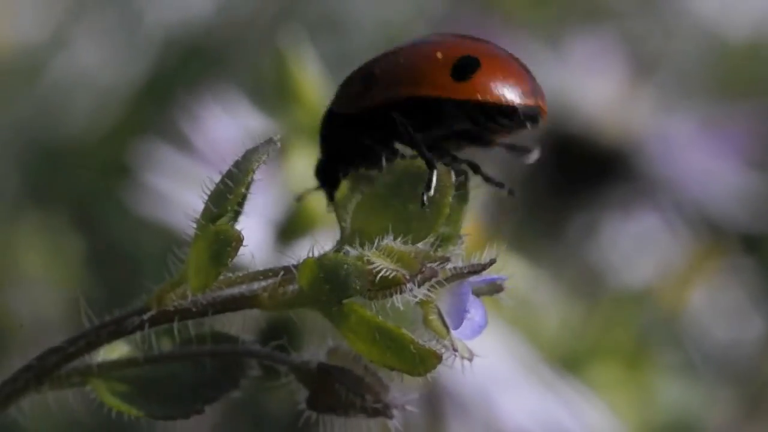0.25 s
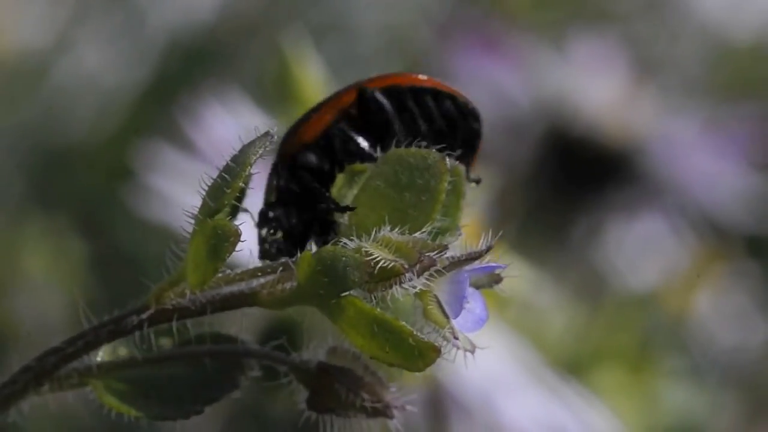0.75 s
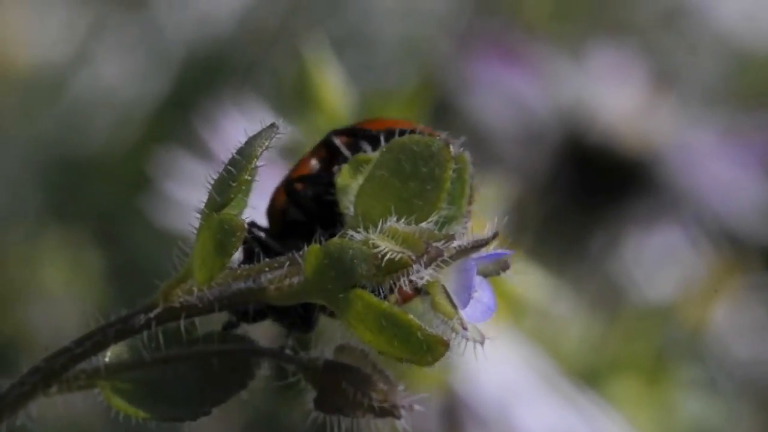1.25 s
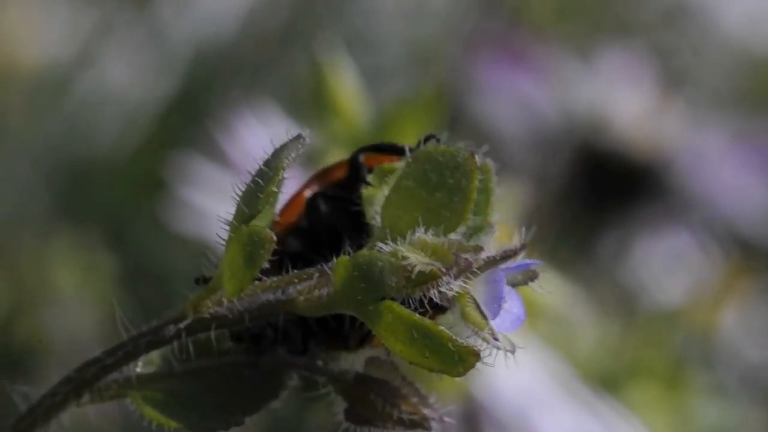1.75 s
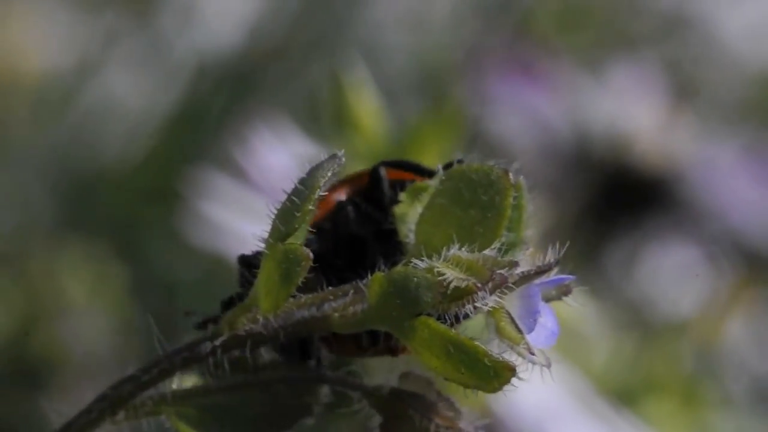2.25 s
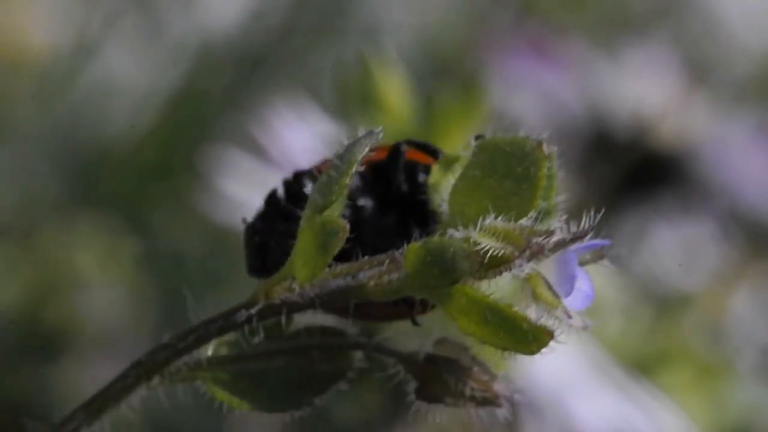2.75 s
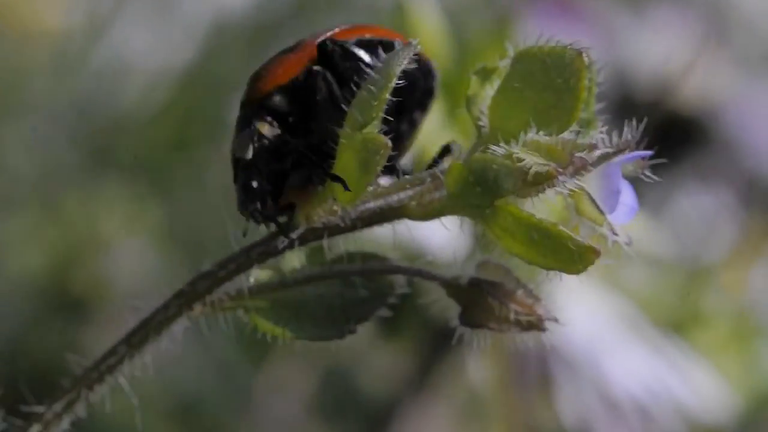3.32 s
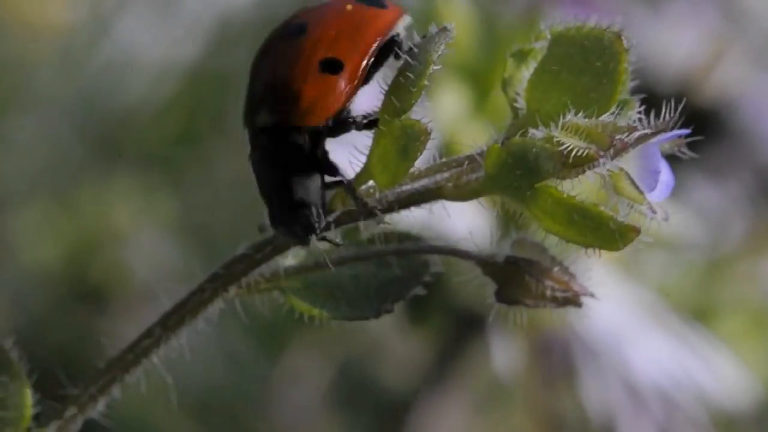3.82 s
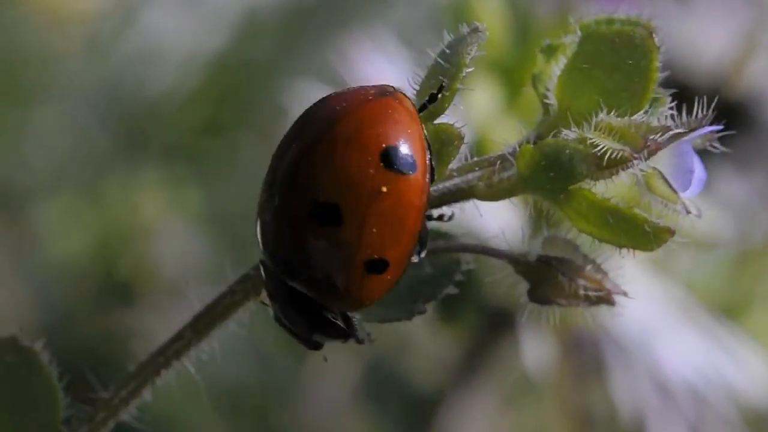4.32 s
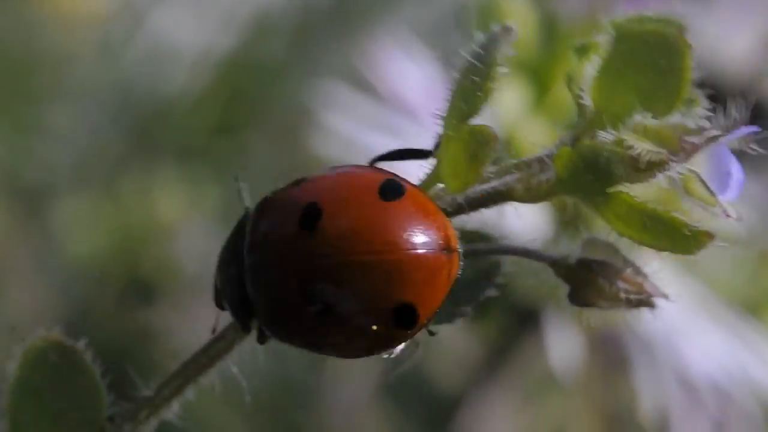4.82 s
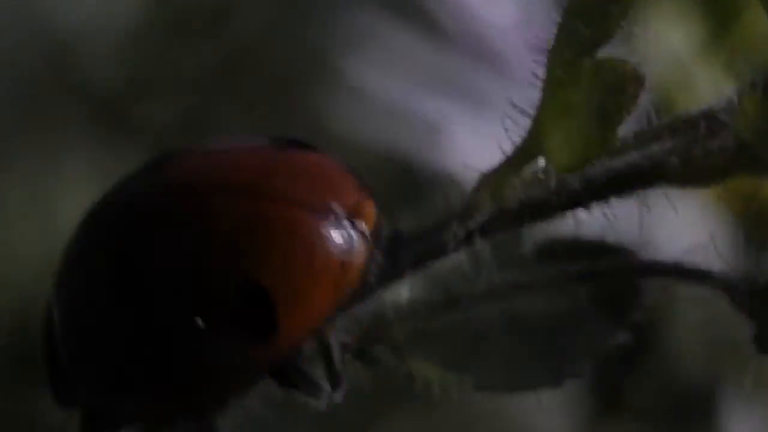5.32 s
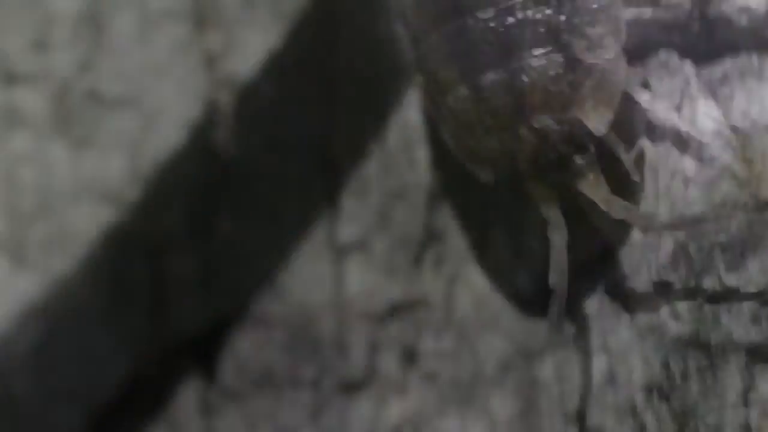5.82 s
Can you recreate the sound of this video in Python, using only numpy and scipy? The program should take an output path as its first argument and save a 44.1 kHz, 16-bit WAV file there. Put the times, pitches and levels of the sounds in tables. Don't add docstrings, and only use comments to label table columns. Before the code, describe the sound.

A songbird a few metres away whistles two fluted, echoing phrases, each ending in quick twittering, over soft distant town wash with faint leaf ticks.

```python
import sys
import numpy as np
from scipy import signal
from scipy.io import wavfile
from scipy.ndimage import uniform_filter1d

SR = 44100
rng = np.random.default_rng(int(sys.argv[2]) if len(sys.argv) > 2 else 0)


def dump_mix(stems):
    frames = np.atleast_2d(stems).T
    limited = np.clip(frames, -1, 1)
    pcm = np.round(limited * 32767).astype(np.int16)
    wavfile.write(sys.argv[1], SR, pcm)


def how_loud(loudness_db):
    steps = np.asarray(loudness_db, float) / 20
    return 10 ** steps


N = 267687

# (frequency [Hz], density [dB per Hz])
WASH = [(20, -37), (40, -43), (80, -19.5), (160, -20.5), (260, -12), (450, -4.5), (800, 1), (1150, -0.5),
        (1700, -6), (2600, -8.5), (5000, -11), (10000, -12.5), (16000, -14)]
# (time [s], level [dB])
SWELL = [(0, 1), (1, 2), (2, 1.5), (2.6, 1.8), (3.6, 2), (4.3, 2.5), (5.1, 3), (5.5, 2), (6.1, 1.5)]
# (time [s], pitch [Hz], level [dB])
PHRASE_ONE = [
    [(.506, 1903, -49), (.516, 1908, -39), (.53, 1922, -40.5), (.562, 1865, -31.5), (.582, 1510, -40.5),
     (.62, 1874, -31), (.655, 1947, -38.5), (.685, 1872, -31), (.712, 1640, -40)],
    [(.828, 2270, -37), (.845, 2350, -25.5), (.87, 2044, -25), (.89, 2142, -32.5), (.91, 2230, -26.5),
     (.935, 2360, -29.5), (.95, 2695, -25.5), (.985, 3312, -35), (1.02, 3280, -28), (1.048, 3115, -45)],
    [(1.213, 1970, -43), (1.226, 2270, -31), (1.26, 2283, -28.5), (1.31, 2198, -23.5), (1.34, 2192, -26),
     (1.362, 2110, -31.5), (1.376, 1910, -32.5), (1.386, 1660, -39)],
    [(1.383, 1647, -33.5), (1.41, 1444, -46), (1.45, 1425, -45.5), (1.49, 1463, -47), (1.52, 1439, -41),
     (1.548, 1488, -54), (1.568, 1486, -44), (1.59, 1470, -57), (1.605, 1493, -64), (1.66, 1456, -56)],
]
PHRASE_TWO = [
    [(2.768, 1647, -50), (2.79, 1627, -41), (2.818, 1667, -35.5), (2.84, 1458, -33.5), (2.87, 1422, -47),
     (2.962, 1442, -52)],
    [(2.97, 1380, -44), (2.98, 1420, -35.5), (2.993, 1270, -41)],
    [(3.063, 1650, -48), (3.078, 1840, -33.5), (3.092, 2011, -29), (3.11, 2025, -23), (3.125, 1988, -29.5),
     (3.134, 1700, -38)],
    [(3.233, 2121, -27.5), (3.256, 2212, -28), (3.28, 2350, -26), (3.305, 2470, -27), (3.335, 2642, -23),
     (3.39, 2697, -25), (3.45, 2756, -25.5), (3.497, 2658, -29.5)],
]
PHRASE_TWO_END = [
    [(3.733, 1620, -54), (3.745, 1707, -55), (3.762, 1660, -47), (3.773, 1640, -44.5), (3.78, 1630, -37)],
    [(3.76, 2524, -52), (3.775, 2503, -42), (3.797, 2482, -37.5), (3.803, 2445, -52), (3.81, 2437, -37.5),
     (3.83, 2394, -38.5), (3.835, 2310, -41), (3.846, 2170, -40)],
    [(3.84, 1637, -43), (3.855, 1655, -35), (3.88, 1650, -32.5), (3.9, 1668, -32), (3.907, 1650, -48)],
    [(3.94, 1676, -54), (3.98, 1718, -35), (4.02, 1733, -33.5), (4.07, 1797, -29.5), (4.085, 1873, -36.5),
     (4.1, 1960, -26.5), (4.109, 1960, -38)],
    [(4.104, 2016, -34), (4.115, 2155, -36.5), (4.125, 2473, -31), (4.138, 2605, -28), (4.165, 2600, -41),
     (4.185, 2590, -27), (4.197, 2567, -28), (4.208, 2547, -22.5), (4.216, 2440, -23)],
]
# (2nd multiple [dB], 3rd [dB], higher ones [dB], throat ring [Hz],
# held back at the onset [dB])
COLOURS = [(-12, -4, -12, 10200, 2), (-3.5, -17, -10, 8000, 8), (-9.5, -9, -9.5, 12100, 10),
           (-5.5, -10, 0.5, 11700, -3.5), (-4, -6, -9, 13000, 0), (-3, -7, -9, 11000, 9),
           (-14, -11, -8.5, 10150, 10), (2, 6, -3.5, 10600, 17), (5.5, -4, -12, 9100, 6.5),
           (-9, -13, -7, 9800, 12), (-5, -5, -7, 9800, 4), (-5.5, 2, -1, 12100, 20), (5, -12, -7, 10570, 3)]
HIGHER_DB = (-2.5, 1, 5, -5, 4, -7)
# (frequency [Hz], level [dB])
BEAK = [(1500, 20), (3200, 12), (4500, 3.5), (5300, -6.5), (6500, 4.5), (7500, -11), (8600, -0.5),
        (9300, 2), (10000, 2.5), (10700, 5.5), (11800, -1), (12600, 1), (13500, -9), (16000, -5)]
# (arches [count], length of one [s])
WARBLE = [(3, .0208), (2, .025), (5, .0306)]
# (time [s], depth [Hz])
WARBLE_DEPTH_HZ = [(3.25, 563), (3.3, 575), (3.34, 440), (3.37, 603), (3.47, 642)]
# (frequency [Hz], t60 [s])
GARDEN = [(800, 0.58), (1700, 0.66), (2500, 0.63), (3500, 0.6), (6000, 0.41), (9000, 0.3), (14000, 0.29)]
# (delay [s], level [dB])
WALLS = [(.009, -11.5), (.024, -10), (.04, -15.5), (.062, -29), (.075, -33), (0.151, -25.5)]
# (time [s], pitch [Hz], level [dB])
HUM = [(.7, 325, -65), (1, 338.7, -63), (1.6, 336.7, -63), (2.198, 324.7, -62.5), (3.1, 332, -65),
       (3.699, 331, -69)]
# (time [s], peak [dB], ring [Hz], ring t60 [s], bright crack [dB])
TICKS = [(.7105, -11, 1500, .006, -20), (.7113, -24, 3300, .004, -25), (.7112, -18.5, 720, .011, -40),
         (.802, -42, 3500, .02, -42), (.8495, -36, 5000, .01, -33), (.904, -25, 800, .03, -42),
         (.922, -26, 850, .03, -42), (1.507, -38, 3000, .01, -52), (1.305, -40, 3200, .02, -46),
         (1.868, -32, 900, .03, -50), (1.889, -35, 900, .03, -50), (2.1935, -34, 4000, .004, -33),
         (2.148, -42, 4000, .015, -55), (2.238, -36, 2000, .008, -36), (4.1485, -20, 700, .012, -26),
         (4.17, -30, 800, .02, -45), (4.136, -32, 900, .015, -45), (4.183, -32, 800, .015, -45),
         (4.193, -32, 700, .015, -45), (4.207, -28, 1100, .012, -42), (3.849, -30, 2200, .012, -42),
         (4.602, -35, 750, .03, -55), (4.614, -35, 750, .03, -55), (5.228, -44, 8000, .02, -35),
         (5.523, -38, 1500, .02, -38), (5.843, -34, 1000, .03, -38)]
# (start [s], length [s], level [dB], centre [Hz], width [Hz])
RUSTLES = [(0.78, 0.029, -36.5, 4000, 8200), (1.748, 0.073, -42.5, 2800, 1300),
           (1.733, 0.25, -49.5, 2150, 1300), (2.07, 0.073, -54, 6000, 2000),
           (0.748, 0.094, -45.5, 2800, 1700), (0.79, 0.054, -49.5, 11000, 5040),
           (0.96, 0.091, -52, 5500, 7000), (5.1, .05, -66, 7400, 3000), (0.788, 0.079, -49, 9000, 9000),
           (0.83, 0.12, -39.5, 830, 1400), (2.956, 0.19, -48.5, 2000, 2000), (4.107, 0.17, -42, 1300, 1000),
           (4.177, 0.55, -46, 4300, 4800), (5.173, 0.19, -49, 1400, 1400), (5.6, 0.057, -46, 4700, 10000)]
# (time [s], pitch [Hz], level [dB])
UPPER = [
    [(1.728, 2086, -52), (1.74, 3350, -39), (1.752, 7330, -49), (1.761, 8250, -37), (1.766, 8700, -55)],
    [(2.112, 8200, -55), (2.125, 8560, -50), (2.158, 8200, -43.5), (2.18, 8150, -57)],
    [(2.183, 5850, -39), (2.187, 6500, -40), (2.19, 7530, -47), (2.196, 8300, -46), (2.21, 8190, -45),
     (2.232, 7900, -59), (2.24, 7700, -43), (2.249, 6600, -61)],
    [(4.633, 4720, -48), (4.652, 5100, -43), (4.664, 5850, -40), (4.676, 6190, -38.5), (4.74, 6110, -45),
     (4.751, 6160, -46)],
    [(4.892, 3700, -46), (4.9, 6860, -43), (4.906, 6060, -44), (4.92, 6360, -50)],
]
# (start [s], length [s], from [Hz], ceiling [Hz], level [dB])
WHIPS = [(1.77, .017, 5500, 8350, -39), (1.79, .018, 4900, 8350, -40), (1.812, .011, 5150, 8300, -41),
         (1.896, .068, 6160, 8220, -48), (1.992, .072, 3600, 8100, -47)]
# (time [s], pitch [Hz], level [dB])
FALL = [
    [(1.748, 2000, -48), (1.757, 2300, -47), (1.763, 2900, -38), (1.769, 2700, -45)],
    [(1.778, 3200, -42), (1.782, 3250, -33), (1.786, 3200, -35), (1.792, 3500, -44), (1.797, 3800, -34)],
    [(4.684, 4200, -47), (4.7, 3930, -36.5), (4.71, 3760, -44), (4.717, 3700, -30.5), (4.728, 3640, -31),
     (4.742, 3573, -36), (4.75, 3560, -45)],
]
# (start [s], length [s], from [Hz], to [Hz], level [dB])
LOWER = [(1.767, 0.0088, 4130, 3460, -41), (1.785, 0.015, 4850, 3660, -55),
         (1.797, 0.0123, 3400, 2790, -41), (1.806, .009, 4350, 3200, -37), (1.814, .012, 3450, 3000, -42),
         (4.353, .027, 4300, 2400, -41), (4.881, .014, 3670, 3750, -41), (4.897, 0.04, 3800, 3800, -50.5)]
# (time from the chip's start [s], pitch [Hz], level [dB])
LEAD = [(0, 3993, -47), (.008, 4070, -46), (.012, 3640, -33.5), (.02, 3550, -31), (.024, 3400, -42),
        (.027, 3290, -40), (0.033, 3000, -43)]
ANSWER = [(0, 3600, -51), (.004, 3590, -26.5), (.008, 3390, -45), (.014, 3350, -39.5), (0.024, 3130, -47)]
# (lead [s], answer [s], level [dB])
PAIRS = [(1.901, 1.937, 0), (2.003, 2.04, -3)]
# (time [s], level [dB])
HOARSE = [(1.83, -3), (1.9, -10), (2.1, -14), (4.6, -20)]
# (start [s], length [s], from [Hz], to [Hz], level [dB])
FAR = [(5.262, .02, 2420, 2730, -59), (5.285, .015, 2950, 4100, -57), (5.33, .014, 4850, 2500, -53),
       (3.04, .06, 2870, 4130, -68)]
# (start [s], length [s], settles on [Hz], level [dB], coupling of the two sides [dB])
TRILL = [(4.372, 0.03, 3790, -27.5, -5), (4.407, 0.03, 3810, -25, -3), (4.443, 0.038, 3876, -27.5, -1.5),
         (4.48, 0.025, 3745, -26.5, 0.5), (4.514, 0.034, 3630, -28.5, 2), (4.548, 0.034, 3450, -35, -1)]
# (time from the stroke [s], pitch [Hz], level [dB])
UNDER = [(-.007, 3800, -56), (0, 2955, -49), (.008, 2280, -49.5), (.02, 2120, -53), (.032, 2035, -47)]
# (frequency [Hz], level [dB])
WHINE = [(15704, -84), (15734, -94)]

TOP_HZ = 15790
TWITTER_TIMBRE = (-3, -30)


def evened(x):
    return x / np.sqrt(np.mean(x ** 2) + 1e-20)


def drift(size):
    once = uniform_filter1d(rng.standard_normal(N), size=size)
    return evened(uniform_filter1d(once, size=size))


def curve(points):
    return np.interp(np.arange(N) / SR, *np.transpose(points))


def read(points, hz):
    f, value = np.transpose(points)
    return np.interp(np.log(hz + 1), np.log(f + 1), value)


def add(mix, s, sound):
    part = mix[round(s * SR):][:len(sound)]
    part += sound[:len(part)]


def resonate(x, hz, width):
    turn = np.exp(2j * np.pi * hz * np.arange(len(x)) / SR)
    r = np.exp(-np.pi * width / SR)
    return 2 * (turn * signal.lfilter([1 - r], [1, -r], x / turn)).real


def wash():
    frames, hz = N // 256 + 5, np.fft.rfftfreq(1024, 1 / SR)
    a, b, patches = rng.standard_normal((frames, 513, 3)).T
    patches = uniform_filter1d(patches, size=10, axis=0)
    patches = evened(uniform_filter1d(patches, size=12, axis=1))
    patchy_db = read([(300, 3.0), (1500, 0.51), (5000, .7)], hz)[:, None]
    z = (a + 1j * b) * how_loud(read(WASH, hz)[:, None] + patchy_db * patches)
    noise = signal.istft(z, nperseg=1024, noverlap=768)[1][:N]
    return how_loud(-48 + curve(SWELL)) * evened(noise)


def breeze():
    return how_loud(-84.0 + 4.7 * drift(3000)) * evened(resonate(rng.standard_normal(N), 86, 58))


def voice(notes, timbres, drops=None, fade=0.0011, reedy_db=-60, shimmer_db=1.1, wobble=0.00027,
          follow=1., octave_db=0., mid_hz=2000, rings_hz=None, shy_db=None, patchy_db=0., bloom=.3,
          size=200, glide_db=0.):
    out = np.zeros(N)
    shimmer = shimmer_db * drift(90)
    patches = patchy_db * evened(uniform_filter1d(shimmer, size=500))
    for n, (rows, timbre) in enumerate(zip(notes, timbres)):
        s, *columns = np.transpose(rows)
        t = np.arange(s[0], s[-1], 1 / SR)
        first = round(s[0] * SR)
        span = slice(first, first + len(t))
        hz, db = (uniform_filter1d(np.interp(t, s, c), size=size, mode="nearest") for c in columns)
        effort_db = follow * (db + 30) - 30
        bright_db = effort_db + reedy_db + octave_db * np.log2(hz / mid_hz) + 0.33 * shimmer[span]
        if shy_db:
            bright_db -= shy_db[n] * np.exp(-(t - s[0]) / (bloom * (s[-1] - s[0])))
        troughs_db, full_glide = 0, 9000
        if drops is not None:
            drop = drops[span]
            bright_db -= np.interp(t, [3.2, 3.3, 3.35, 3.4], [0.0049, 0.013, 0.028, 0.0033]) * drop
            hz = hz - drop
            troughs_db = -.018 * drop
            db = db - np.interp(t, [3.2, 3.23, 3.29, 3.33], [.011, .026, .02, .008]) * drop
            full_glide = np.where(troughs_db < 0, 70000, 9000)
        glide = abs(np.gradient(hz)) * SR / full_glide
        slurred_db = -glide_db * np.minimum(glide, 1)
        hz = hz * (1 + wobble * shimmer[::-1][span])
        phase = 2 * np.pi * (np.cumsum(hz) / SR + rng.random())
        tone = how_loud(db + shimmer[span]) * np.sin(phase)
        for k, own_db in enumerate(timbre, start=2):
            over_db = bright_db + own_db + (slurred_db if k < 4 else troughs_db) + read(BEAK, k * hz)
            over_db = over_db + patches[first - 2000 * k:][:len(t)]
            if rings_hz:
                over_db += 6 / (1 + ((k * hz - rings_hz[n]) / 230) ** 2)
            tone += (k * hz < TOP_HZ) * how_loud(over_db) * np.sin(k * phase)
        edge = np.clip(np.minimum(t - s[0], s[-1] - t) / fade, 0, 1)
        add(out, s[0], np.sqrt(2) * tone * np.sin(np.pi / 2 * edge) ** 2)
    return out


def pitch_drops():
    t = np.arange(N) / SR
    start, end, rate_hz, depth_hz = .885, .978, 111, 620
    wobble = np.sin(np.pi * (t - start) * rate_hz) ** 2
    flutter = depth_hz * wobble * np.interp(t, [start, start + 0.0075, end - .03, end], [0, 1, 1, 0])
    arches, period = np.transpose(WARBLE)
    at = 3.23 + np.cumsum(np.append(0, arches * period))
    turns = np.interp(t, at, np.cumsum(np.append(0, arches)))
    lean = np.interp(t, [3.25, 3.36], [.36, .85])
    sharp = np.interp(t, [3.25, 3.31], [1.0, 1.6])
    trough = (1 - np.sin(np.pi * (turns % 1) ** lean)) ** sharp
    warble = curve(WARBLE_DEPTH_HZ) * (t > at[0]) * (t < at[-1]) * trough
    return uniform_filter1d(warble + flutter, size=40)


def flute():
    timbres = [(second, third, *np.add(HIGHER_DB, higher)) for second, third, higher, *_ in COLOURS]
    return voice(PHRASE_ONE + PHRASE_TWO + PHRASE_TWO_END, timbres, pitch_drops(), fade=0.0037,
                 reedy_db=-27, follow=0.28, octave_db=16.0, shy_db=[row[-1] for row in COLOURS],
                 bloom=0.12, patchy_db=2.5, glide_db=11, rings_hz=[row[-2] for row in COLOURS])


def garden(x):
    taps = np.zeros(SR)
    at = np.arange(300, SR - 20, 20)
    taps[at + rng.integers(0, 20, len(at))] = rng.choice([-1., 1.], len(at))
    taps *= 1 - 0.067 * np.exp(-np.arange(SR) / SR / 0.0037)
    for s, db in WALLS:
        add(taps, s, how_loud(db + 6.5) * rng.standard_normal(400) * np.hanning(400))
    hz, t, z = signal.stft(taps, SR, nperseg=256)
    air_db = read([(2000, -1.3), (6000, 2.4), (12000, -0.39)], hz)[:, None]
    decay_db = air_db - 60 * t / read(GARDEN, hz)[:, None]
    tail = signal.istft(z * how_loud(decay_db), SR, nperseg=256)[1]
    return how_loud(-3.0) * signal.fftconvolve(x, tail / np.linalg.norm(tail))[:N]


def insect():
    t, (s, hz, db) = np.arange(N) / SR, np.transpose(HUM)
    waver = drift(3000)
    phase = 2 * np.pi * np.cumsum(np.interp(t, s, hz) + 3.13 * waver) / SR
    return how_loud(np.interp(t, s, db, -99, -99) + 1.7 * np.roll(waver, SR)) * np.sin(phase)


def leaves():
    out, t = np.zeros(N), np.arange(2000) / SR
    for s, db, hz, t60, crack_db in TICKS:
        snap = rng.standard_normal(len(t)) + 1.64 * (t < .00007)
        crack = how_loud(crack_db - 60 * t / 0.0051) * snap
        add(out, s, how_loud(db - 60 * t / t60) * np.sin(2 * np.pi * hz * t) + crack)
    size = np.minimum(rng.exponential(1, N // 60 + 1), 3)
    grains = rng.standard_normal(N) * how_loud(2.4 * np.repeat(size, 60)[:N])
    for s, length, db, hz, width in RUSTLES:
        part = evened(resonate(grains[round(s * SR):][:round(length * SR)], hz, width))
        add(out, s, how_loud(db) * part * signal.windows.tukey(len(part), .6))
    return signal.sosfilt(signal.butter(8, 440, "high", fs=SR, output="sos"), out)


def strokes(rows, pitch, peak, start_db, end_db):
    u = np.linspace(0, 1, 16)
    rise_db = start_db * (1 - u / peak) ** 2
    fall_db = end_db * ((u - peak) / (1 - peak)) ** 2
    swell_db = np.where(u < peak, rise_db, fall_db)
    return [np.transpose([s + length * u, pitch(length * u, length, *hz), db + swell_db])
            for s, length, *hz, db in rows]


def slide(t, length, from_hz, to_hz):
    u = (t / length) ** 0.98
    return from_hz + (to_hz - from_hz) * (u + 0.44 * np.sin(2 * np.pi * u) / (2 * np.pi))


def whip(t, length, from_hz, top_hz):
    climb_hz_per_s, knee, sag_hz_per_s = 290000, 5, 3500
    climb = climb_hz_per_s * t / (top_hz - from_hz)
    rounded = climb / (1 + climb ** knee) ** (1 / knee)
    droop = 1000 * np.exp((t - length) / .007) * (length > .03)
    return from_hz + (top_hz - from_hz) * rounded - droop - sag_hz_per_s * t


def twitter():
    high = UPPER + strokes(WHIPS, whip, peak=.3, start_db=-4, end_db=-2)
    chips = [np.add(shape, [s, 0, db]) for *starts, db in PAIRS for shape, s in zip((LEAD, ANSWER), starts)]
    low = FALL + chips + strokes(LOWER, slide, peak=.45, start_db=-8, end_db=-8)
    upper = voice(high, [(-20, -26)] + [TWITTER_TIMBRE] * len(high), fade=0.00028, reedy_db=-11.5,
                  shimmer_db=3.0, wobble=0.0017, size=90, octave_db=-13, mid_hz=6500)
    lower = voice(low, [(-22, -9)] * 2 + [(-11, -11)] + [(6, -1.5)] * len(low), fade=0.00042,
                  reedy_db=-18.5, shimmer_db=2.5, wobble=0.0013, octave_db=-30, mid_hz=3540, size=70)
    coupled = upper * np.tanh(lower / how_loud(-41)) * how_loud(-35.5)
    sums = how_loud(33.5) * resonate(resonate(coupled, 10900, 3600), 10900, 3600)
    hoarse = how_loud(curve(HOARSE)) * (upper + lower) * resonate(rng.standard_normal(N), 1700, 840)
    return upper + lower + sums + hoarse


def far_bird():
    notes = strokes(FAR, slide, peak=.45, start_db=-4, end_db=-5)
    return voice(notes, [()] * len(FAR), shimmer_db=4)


def settle(t, length, end_hz):
    return end_hz + (4824 - end_hz) * np.exp(-t / 0.014)


def trill():
    notes = strokes([row[:-1] for row in TRILL], settle, peak=0.43, start_db=-11.5, end_db=-10.5)
    upper = voice(notes, [np.add((0, -6), row[-1]) for row in TRILL], fade=0.0023, reedy_db=-13.5,
                  shimmer_db=1.5, wobble=0.0015, octave_db=-53, mid_hz=4000,
                  shy_db=[8.0] * len(TRILL), bloom=0.3)
    dives = [np.add(UNDER, [row[0], 0, row[-1]]) for row in TRILL]
    under = voice(dives, [TWITTER_TIMBRE] * len(TRILL), fade=0.0018, reedy_db=5.0, shimmer_db=3.5,
                  wobble=0.0058)
    rattle = how_loud(37) * resonate(resonate(upper * under, 6400, 2200), 6400, 2200)
    rattle += how_loud(72.5) * resonate(resonate(upper ** 2 * under, 8300, 2500), 8600, 2300)
    rasp = upper * resonate(rng.standard_normal(N), 2200, 1500)
    rattle += how_loud(-13) * resonate(resonate(rasp, 7000, 2400), 4800, 2400)
    return upper + how_loud(-1.0) * under + rattle


def scene():
    whistles, chatter, rattled = flute(), twitter(), trill()
    far, litter = far_bird(), leaves()
    sent = whistles + how_loud(-4.5) * rattled + how_loud(-2) * chatter + how_loud(5.0) * far + how_loud(-15.0) * litter
    direct = how_loud(3.0) * (whistles + rattled + chatter) + how_loud(7.0) * far + litter
    return (direct + garden(sent) + wash() + insect() + breeze())[None]


def roll_off(x):
    return signal.sosfilt(signal.butter(12, 16990, fs=SR, output="sos"), x)


def record(dry):
    t = np.arange(N) / SR
    rumble = signal.sosfilt(signal.butter(1, [25, 130], "band", fs=SR, output="sos"), dry ** 2)
    whine = sum(how_loud(db) * np.sin(2 * np.pi * hz * t) for hz, db in WHINE)
    x = dry + how_loud(-17.5) * rumble + whine
    x = x - .85 * resonate(x[0], hz=7860, width=300)
    band = signal.firwin(1023, TOP_HZ, window=("kaiser", 9), fs=SR)
    x = signal.oaconvolve(x, band[None], "same")
    return roll_off(x)


dry = scene()
out = record(dry)
dump_mix(out)
```